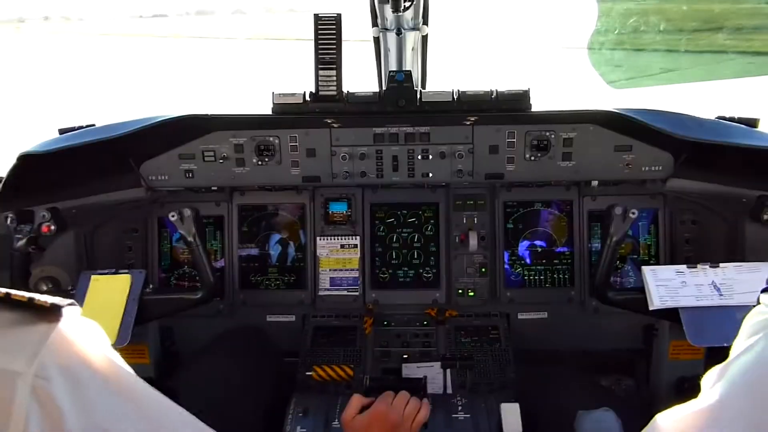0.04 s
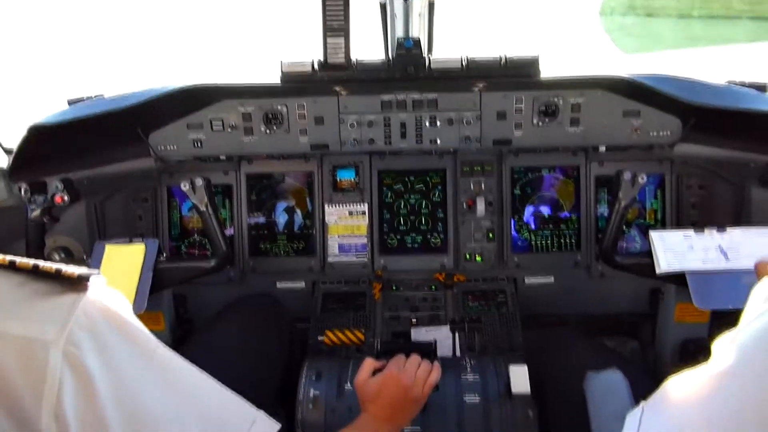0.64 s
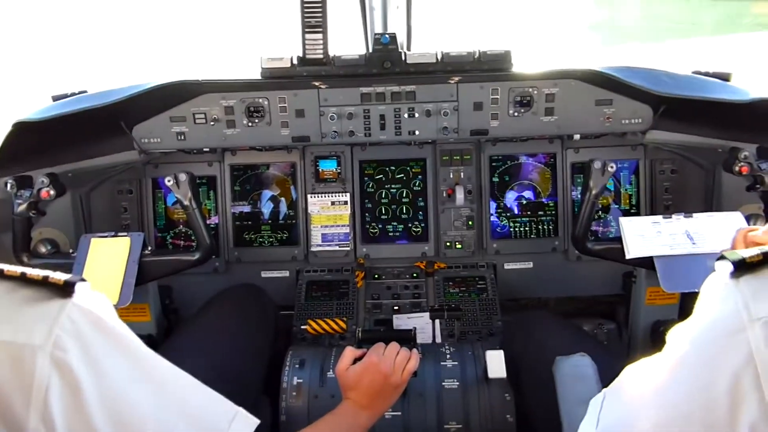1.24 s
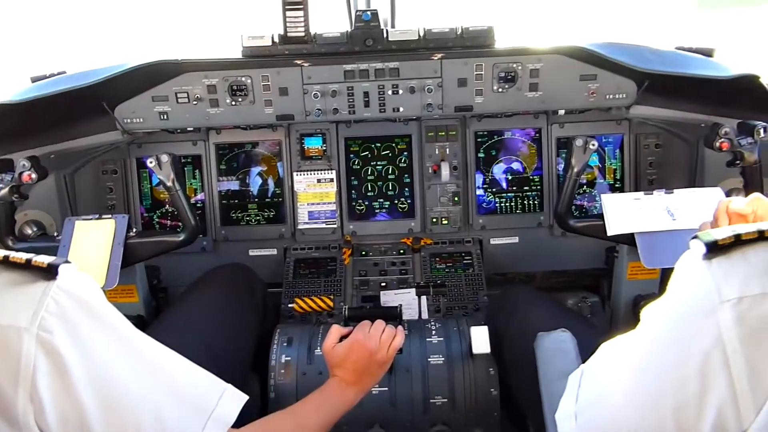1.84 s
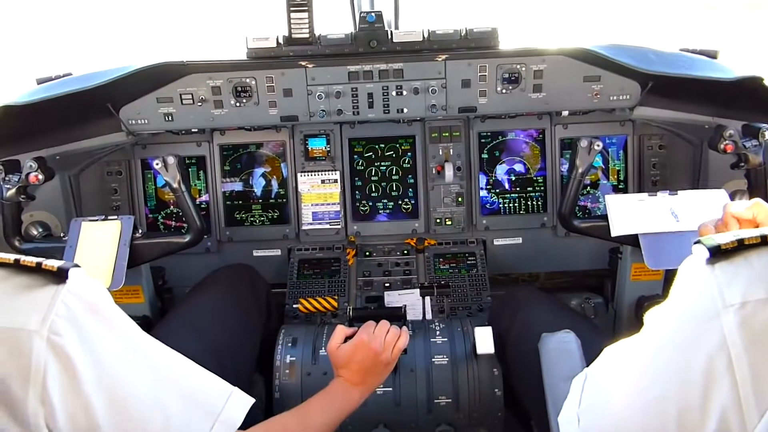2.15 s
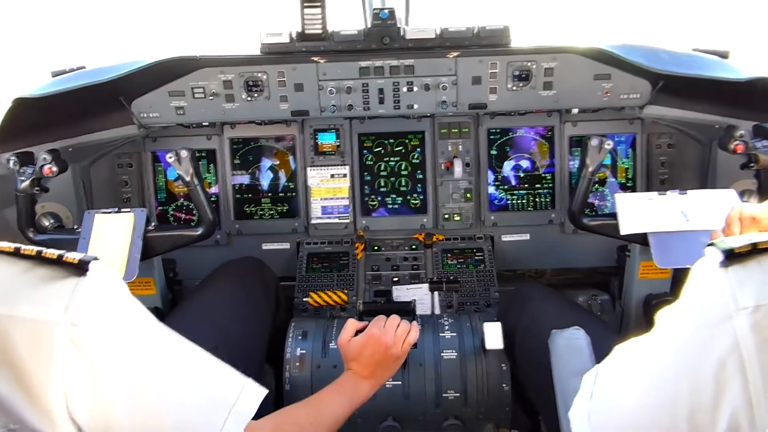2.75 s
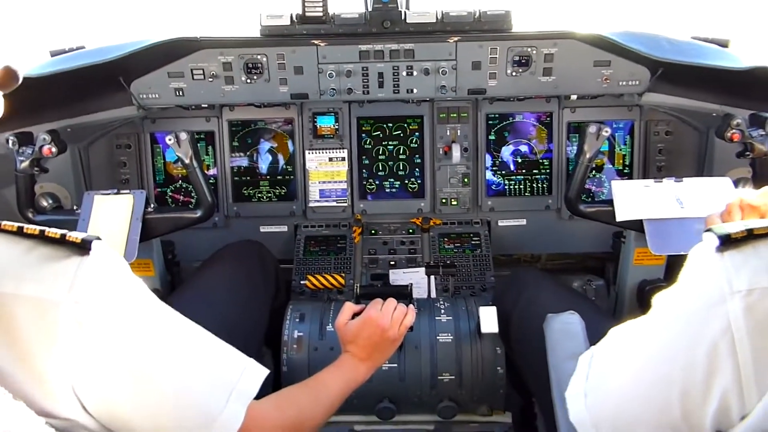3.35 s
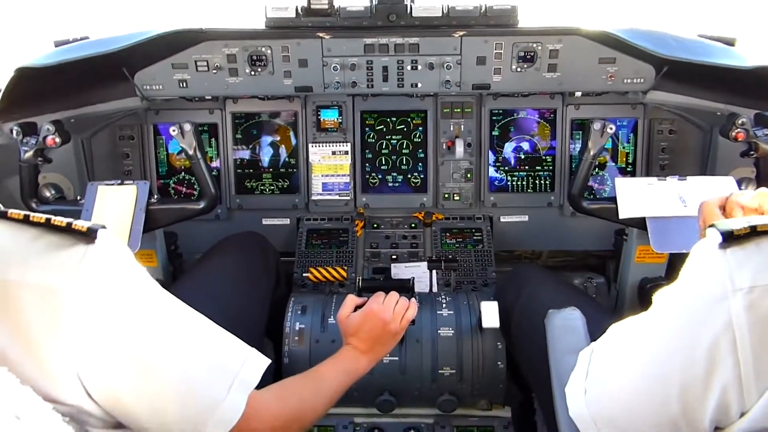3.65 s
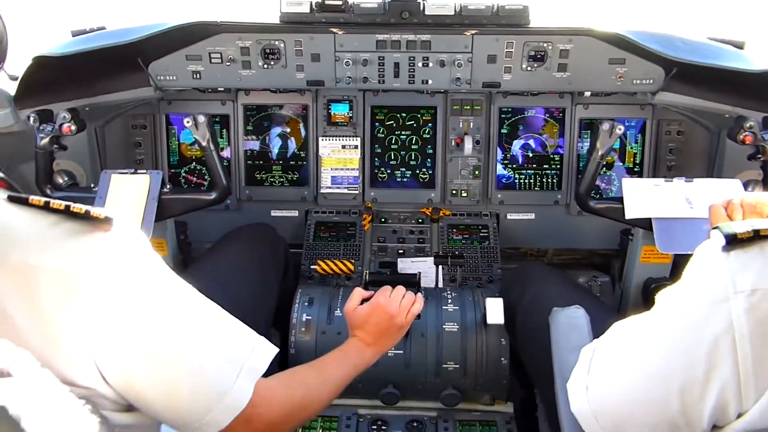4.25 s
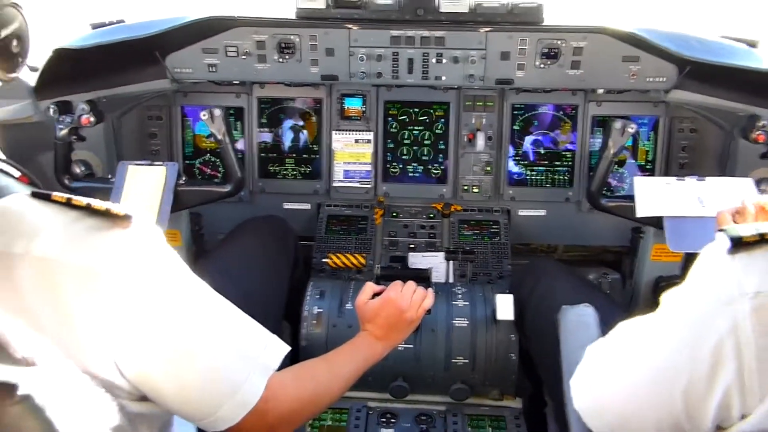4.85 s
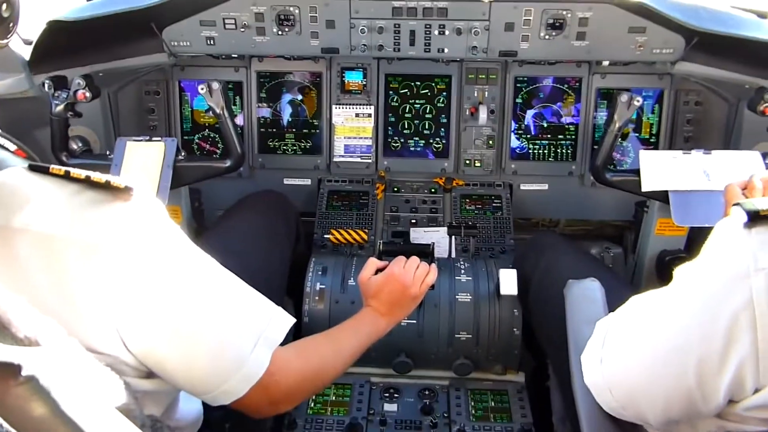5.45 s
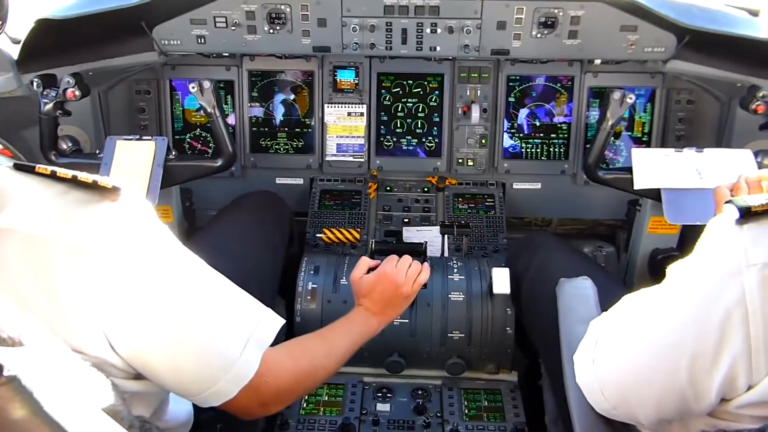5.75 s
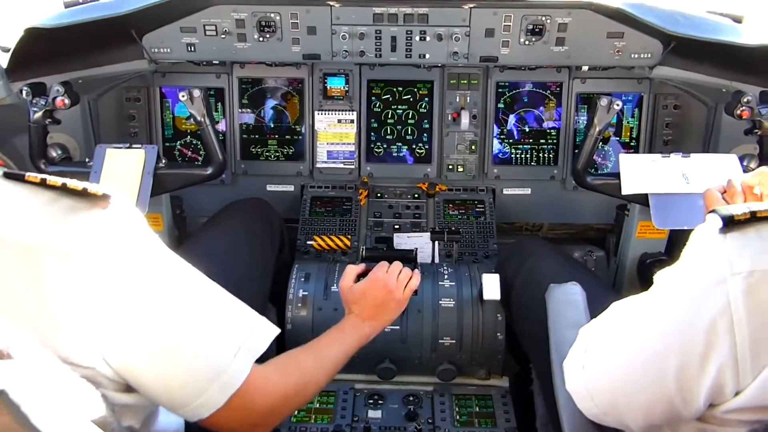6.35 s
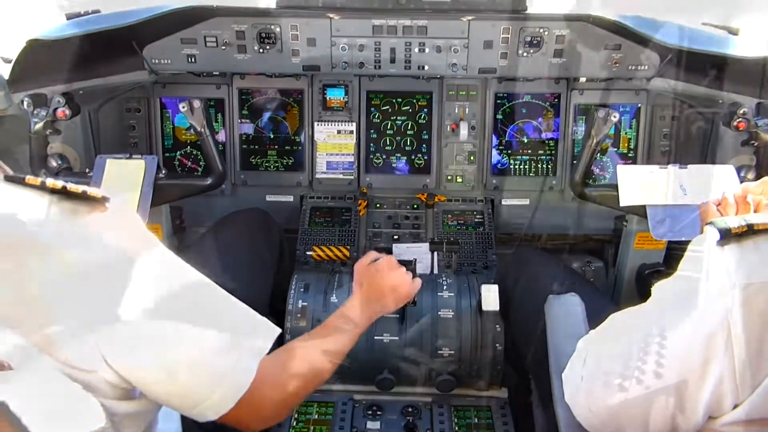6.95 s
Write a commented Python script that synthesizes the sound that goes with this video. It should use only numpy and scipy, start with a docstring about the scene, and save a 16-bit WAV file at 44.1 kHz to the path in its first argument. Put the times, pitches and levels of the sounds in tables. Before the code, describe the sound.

A throbbing propeller drone and deep rumble fill a taxiing turboprop's cockpit, with air vents hissing and a loose panel clacking over bumps.

```python
"""A throbbing propeller drone over a deep rumble: a twin turboprop taxiing, heard from the back of its cockpit.
The blades drone through the hull and their wash shakes it; vents hiss, turbines and fans whine faintly.
Bumps in the taxiway shake a loose panel, which clacks a little lower when hit hard,
and a few dry ticks snap close to the microphone."""
import sys
import numpy as np
from scipy import signal
from scipy.fft import rfft, irfft, next_fast_len
from scipy.io import wavfile
from scipy.ndimage import uniform_filter1d

SR = 44100
rng = np.random.default_rng(int(sys.argv[2]) if len(sys.argv) > 2 else 0)


def transcribe(signal):
    """Save signal, clipped to [-1, 1], as a 16-bit WAV file at the path in sys.argv[1]."""
    frames = np.atleast_2d(signal).T
    limited = np.clip(frames, -1, 1)
    pcm = np.round(limited * 32767).astype(np.int16)
    wavfile.write(sys.argv[1], SR, pcm)


N = 313551
T = np.arange(N) / SR
SIZE = next_fast_len(N, real=True)
HZ = np.maximum(np.arange(SIZE // 2 + 1) * SR / SIZE, 1)


def undb(db):
    """Decibels to gain."""
    return 10 ** (np.asarray(db) / 20)


def unit(x):
    """Scale to rms 1."""
    return x / np.sqrt(np.mean(np.abs(x) ** 2))


def curve(table, column=1):
    """Automation lane: one column of (time [s], ...) rows at every sample."""
    rows = np.array(table)
    return np.interp(T, rows[:, 0], rows[:, column])


def colour(points):
    """EQ curve: gain at every frequency from (frequency [Hz], level [dB]) points."""
    hz, db = np.transpose(points)
    return undb(np.interp(np.log(HZ), np.log(hz), db))


def bell(hz, width_hz):
    """Gain of a resonance with steep skirts, 1 at its centre."""
    return 1 / (1 + (2 * (HZ - hz) / width_hz) ** 4)


def shape(x, gain):
    """Filter by a gain at every frequency."""
    return irfft(rfft(x, SIZE) * gain, SIZE)[..., :N]


def walk(rate):
    """Smooth random drift of rms 1 that moves up to about rate times a second."""
    count = int(4 * rate * N / SR) + 8
    steps = np.convolve(rng.standard_normal(count), np.hanning(7)[1:-1] ** 4, "same")
    return unit(np.interp(T, np.arange(count) / (4 * rate), steps))


def swell(x, db):
    """Even out a noise's slow swells and ride it with a dB curve; the mean level stays."""
    power = uniform_filter1d(np.mean(x ** 2, axis=0), size=SR // 8)
    return x * np.sqrt(power.mean() / power) * unit(undb(db))


def shudder(age, t60_s, rise_s=.003):
    """Envelope of a burst of contacts that builds up to age 0 and dies away."""
    return np.exp(-np.log(1000) * np.maximum(age, 0) / t60_s) * (1 + np.tanh(age / rise_s + 1)) / 2


def cabin_noise(density):
    """Noise of a given spectrum at both microphone ports: alike in the bass, wider in the treble."""
    # sound that differs between the ports against sound they share: (frequency [Hz], ratio [dB])
    diffuse = [(25, -1), (45, -8), (65, -15), (100, -29), (200, -34), (260, -32), (330, -26), (420, -23),
               (520, -16.5), (750, -7), (1200, 0), (2500, 0), (5000, .5), (8000, .5), (12000, 5)]
    real, imag = rng.standard_normal((2, 2, len(HZ)))
    shared, own = (real + 1j * imag) * density * np.sqrt(SR * SIZE) / 2
    apart = colour(diffuse)
    left = (shared + apart * own) / np.hypot(1, apart)
    return irfft(np.array([left, shared]), SIZE)[:, :N]


def standing_waves(ripple_db=1.2, spacing_hz=35):
    """Gain of the many fine peaks and dips that the cabin's walls put on a sound."""
    count = int(SR / 2 / spacing_hz) + 2
    return unit(undb(ripple_db * np.interp(HZ, np.arange(count) * spacing_hz, rng.standard_normal(count))))


def fans():
    """Cooling fans whistle faintly: thin, unsteady tones of narrow-band noise."""
    # fan whistles: (pitch [Hz], level [dB], width [Hz])
    whistles = [(10119, -67, 100), (14260, -64, 190)]
    return cabin_noise(sum(undb(db) * bell(hz, width) / np.sqrt(width) for hz, db, width in whistles))


def turbines(gain_db=4.7, wander_hz=.8, waver_db=1.5):
    """Each engine's gears sing a thin, wandering tone with a sideband on either side."""
    # gear whine of engines 1 and 2: (time [s], pitch 1 [Hz], pitch 2 [Hz], fader 1 [dB], fader 2 [dB])
    whine = [(0, 4150, 4122, -55, -60), (.9, 4152, 4120, -60, -59), (1.4, 4160, 4124, -54, -64),
             (2.2, 4166, 4133, -61, -59), (3, 4169, 4140, -62, -54), (3.7, 4169, 4139, -60, -50),
             (4.3, 4160, 4138, -56, -54), (4.8, 4156, 4138, -63, -55.5), (5.3, 4155, 4136, -58, -54),
             (6.2, 4152, 4137, -65, -61), (7.11, 4150, 4137, -66, -68)]
    # the tone and the sidebands from its shaft's turning: (offset [Hz], gain 1 [dB], gain 2 [dB])
    sidebands = [(-66, -1, -16), (0, 0, 0), (66, -3, -5)]
    out = 0
    for engine in range(2):
        hz = curve(whine, column=1 + engine) + wander_hz * walk(4)
        level_db = curve(whine, column=3 + engine) + gain_db
        for offset_hz, *side_db in sidebands:
            gain = undb(level_db + side_db[engine] + waver_db * walk(3))
            out = out + gain * np.sqrt(2) * np.sin(2 * np.pi * np.cumsum(hz + offset_hz) / SR)
    return out


def vents(flutter_db=0.84):
    """Slightly fluttering air hiss, coloured by its ducts, with two jets and a thin whistle at an edge."""
    # tone of the hiss: (frequency [Hz], density [dB per Hz])
    hiss_eq = [(300, -78.5), (900, -62.5), (1450, -62), (1750, -65.5), (2150, -64), (2900, -64.5),
               (3300, -68.5), (4200, -71), (5000, -79), (6000, -78.5), (8000, -81.5), (10200, -86.5),
               (12000, -90.5), (15000, -93.5)]
    # slow ride of the hiss: (time [s], gain [dB])
    hiss_ride = [(0, 0.5), (1.5, 0), (2.1, -1), (3, 0.5), (4.7, -0.5), (5.8, 0.5), (6.6, 0.2), (7.11, 1.2)]
    # duct resonances and the hollows between them: (centre [Hz], width [Hz], gain [dB])
    ducts = [(1280, 90, 1.5), (1405, 90, -2.5), (1515, 70, 2), (1890, 120, -0.8), (2170, 70, 1.8),
             (2360, 150, -1.6), (2520, 120, 0.8), (2900, 80, 1), (3200, 60, -1.2), (3330, 80, -1.2),
             (12400, 400, 1.5)]
    # air jets, louder or softer as the microphone turns: (time [s], low jet [dB], high jet [dB])
    jets = [(0, -39.5, -44), (.7, -37.5, -73), (1.4, -37, -62), (2.1, -41.5, -60), (2.9, -38.5, -58),
            (4.2, -42, -55), (4.6, -53, -57), (6.3, -64, -56), (7.1, -49, -42)]
    # ride of the whistle: (time [s], level [dB])
    whistle_ride = [(0, -53), (1.3, -50), (2, -60), (7.11, -68)]
    ripple = standing_waves()
    duct_gain = undb(sum(db * bell(hz, width) for hz, width, db in ducts))
    hiss = cabin_noise(colour(hiss_eq) * duct_gain * ripple) * undb(curve(hiss_ride))
    low_jet = unit(cabin_noise(bell(hz=4230, width_hz=2050) * ripple)) * undb(curve(jets, column=1))
    high_jet = unit(cabin_noise(bell(hz=7400, width_hz=4700) * ripple)) * undb(curve(jets, column=2))
    whistle = unit(cabin_noise(bell(hz=2783, width_hz=45))) * undb(curve(whistle_ride))
    return (hiss + low_jet + high_jet + whistle) * undb(flutter_db * walk(25))


def ticks():
    """Tiny dry snaps, each only a few cycles long, a touch to the right."""
    # snaps: (time [s], pitch [Hz], level [dB], half-length [s])
    snaps = [(1.6272, 7040, -3.5, 0.00012), (1.6279, 3150, -8, 0.00031), (1.628, 6500, -27, 0.0003),
             (2.061, 3020, -22, 0.00033), (3.7930, 3500, -10.5, 0.0005), (3.7933, 1300, -18, .0009)]
    out = sum(undb(db) * np.exp(-((T - s) / half_s) ** 2) * np.sin(2 * np.pi * hz * (T - s))
              for s, hz, db, half_s in snaps)
    return out * undb([[-1.5], [0]])


def panel_ring(age, decay_age, jolt_db, focus_hz, focus_db=7, clack_hz=2125, sag_hz=430, detune=.002):
    """The panel's modes ring on; the harder the jolt, the lower its main clack sags."""
    # panel modes: (pitch [Hz], relative level [dB], t60 [s])
    panel = [(995, -2, .09), (1090, .5, .1), (1475, -.5, .09), (1560, -2, .08), (1850, -3.5, .09),
             (2190, -6, .08), (2470, -7, .09), (2715, -5, .09), (2850, -5.5, .08), (3190, -2.5, .075),
             (3540, -3.5, .08), (3650, -3.5, .08), (3770, -4.5, .08), (4050, -4, .08), (4200, -5.5, .07),
             (4470, -8, .07), (4860, -8, .08), (5130, -11, .08)]
    modes = panel + [(clack_hz - sag_hz * undb(jolt_db), 1, .1)]
    ring = 0
    for (hz, db, t60), (scatter, phase) in zip(modes, rng.standard_normal((len(modes), 2))):
        # the place of contact favours the modes around one pitch
        away = min(2 * abs(np.log2(hz / focus_hz)), 1)
        swing = np.sin(2 * np.pi * (hz * (1 + detune * scatter) * age + phase))
        ring = ring + undb(db - focus_db * away) * shudder(decay_age, t60) * swing
    return ring


def loose_panel(body_lag_s=0.0023, clatter_db=-3, edge_db=1, ring_db=-2.5):
    """Each bump sets off a chatter: its sharp edge cracks first, the frame knocks and the panel rings."""
    # taxiway jolts: (time [s], gain [dB], edge send [dB], ring send [dB], favoured pitch [Hz])
    jolts = [(.274, -25, -1, -1, 2100), (0.474, -15, -5.5, 1, 4070), (0.783, -23.5, -3, 2.5, 3700),
             (.998, -21.5, -8, -9, 2600), (1.040, -23.5, -4, -2, 2050), (1.344, -23.5, -6, -6, 4800),
             (1.388, -20, -4, 5.5, 4950), (1.576, -15, -0.5, 2, 1670), (1.726, -42, 12, -6, 2100),
             (1.845, -26.5, -4, -3, 2100), (2.395, -34, 2, -4, 2100), (2.524, -14.5, -3, 0.5, 1040),
             (2.735, -37, 5, -4, 2100), (2.842, -29, 2.5, -1, 2100), (3.254, -34, 5, -2, 2100),
             (3.438, -46, 7, -2, 2100), (3.554, -39, 11, 1, 2100), (3.835, -32, 6, 10, 2100),
             (4.075, -28, 1.5, 6, 2120), (4.199, -37, 6, 0, 2100), (4.405, -33, -3, 6, 2100),
             (4.646, -29, 2, 5.5, 2100), (4.903, -28, 3.5, 6, 2140), (5.193, -27.5, 4, 7, 2140),
             (5.415, -14.5, -2.5, 1, 2600), (6.173, -46, 7, -1, 2100), (6.327, -42, -2, 12, 2100),
             (6.530, -31, -1, 3, 2120)]
    # tone of the chatter: (frequency [Hz], relative level [dB])
    chatter_eq = [(400, -24), (1000, -3.5), (1300, -13), (1550, 1), (2800, -1.5), (4300, -6.5),
                  (5500, -6.5), (8000, -13.5), (10000, -15), (13000, -21), (15500, -27)]
    # woody modes of the frame behind the panel: (pitch [Hz], relative level [dB], t60 [s])
    frame = [(578, -1, .09), (695, -6, .07), (800, -8, .06)]
    chatter = unit(cabin_noise(colour(chatter_eq)) * undb(2 * walk(540)))
    body = shape(chatter, 1 / (1 + (HZ / 5000) ** 4))
    edge = chatter - body
    out = np.zeros((2, N))
    for s, db, edge_send_db, ring_send_db, focus_hz in jolts:
        span = slice(int(s * SR) - SR // 50, int(s * SR) + SR // 6)
        age = T[span] - s
        body_age = age - body_lag_s
        ring = undb(ring_send_db + ring_db) * panel_ring(age, body_age, db, focus_hz)
        knock = sum(undb(mode_db) * shudder(body_age, t60) * np.sin(2 * np.pi * (hz * age + rng.random()))
                    for hz, mode_db, t60 in frame)
        favoured = signal.lfilter(*signal.iirpeak(focus_hz, Q=2, fs=SR), body[:, span])
        clatter = undb(clatter_db) * (body[:, span] + .5 * favoured) * shudder(body_age, t60_s=0.14)
        crack = undb(edge_send_db + edge_db) * edge[:, span] * shudder(age, t60_s=0.11)
        out[:, span] += undb(db) * (clatter + crack + knock + ring)
    return out


def wash(gust_db=0.5, gust_per_s=8, roll_db=3, roll_per_s=4.5, wheels_below_hz=112):
    """Gusty propeller wash and rolling wheels shake the hull, which rings the cabin's air."""
    # tone of the rumble through the hull: (frequency [Hz], density [dB per Hz])
    rumble_eq = [(20, -92), (48, -97), (68, -74), (88, -52), (125, -51), (215, -44), (280, -47.5),
                 (400, -44.5), (540, -47.5), (640, -52.5), (850, -54), (1080, -60.5), (1300, -72),
                 (3000, -81.5)]
    # cabin resonances and the hollows between them: (centre [Hz], width [Hz], gain [dB])
    cabin = [(178, 16, 4.5), (215, 22, -2.5), (296, 20, 6), (317, 20, 5.5), (372, 38, 3), (426, 22, 3),
             (466, 18, -2), (516, 50, 3.3), (645, 30, -1.5), (698, 48, 4.5), (750, 40, 1.5),
             (1090, 70, 1.5)]
    # slow ride of the wash on the hull: (time [s], relative level [dB])
    wash_ride = [(0.0, -15.5), (0.14, -18), (0.28, -16.5), (0.42, -19.5), (0.53, -16), (0.65, -20.5),
                 (0.72, -17), (0.88, -20.5), (1.02, -17.0), (1.28, -18.5), (1.48, -17), (1.72, -20.5),
                 (1.92, -18), (2.08, -20.0), (2.2, -18.5), (2.88, -17.5), (2.98, -17), (3.12, -19),
                 (3.24, -16.5), (3.6, -19.5), (3.88, -18.5), (4.22, -18), (4.32, -19.5), (4.5, -18),
                 (4.75, -21), (4.82, -16.5), (4.9, -22), (4.97, -18.5), (5.06, -20.5), (5.2, -19.0),
                 (5.38, -21.5), (5.6, -16.5), (5.84, -19), (5.92, -16), (6.04, -18.5), (6.26, -20),
                 (6.52, -16.5), (6.9, -19.5), (7.1, -16)]
    cabin_gain = undb(sum(db * bell(hz, width) for hz, width, db in cabin))
    rumble = cabin_noise(colour(rumble_eq) * cabin_gain / (1 + (HZ / 5000) ** 4))
    wheels = shape(rumble, 1 / (1 + (HZ / wheels_below_hz) ** 16))
    air_db = curve(wash_ride) + gust_db * walk(gust_per_s)
    return swell(rumble - wheels, air_db) + swell(wheels, roll_db * walk(roll_per_s))


def blade_tone(hz, rough, gust_rate):
    """One blade harmonic, scattered in size and phase by gusty inflow, then levelled over 1/12 s."""
    load = 1 + rough * (walk(gust_rate) + 1j * walk(gust_rate)) / np.sqrt(2)
    load = load / np.sqrt(uniform_filter1d(np.abs(load) ** 2, size=SR // 12))
    return np.sqrt(2) * np.real(load * np.exp(2j * np.pi * hz * T))


def propellers(blade_hz=64.1, third_db=-1, fourth_db=1, waver_db=1.3, waver_per_s=13):
    """Blade harmonics; the third and fourth meet cabin resonances and waver, the third throbs loudest."""
    # steadier blade harmonics: (multiple, level [dB], roughness)
    harmonics = [(1, -53, 1.0), (2, -34, 0.55), (5, -42.5, 0.89), (6, -43, 2.2)]
    # the drone on the third harmonic swells and sinks: (time [s], fader [dB])
    drone_ride = [(0.0, -49), (0.15, -14.5), (0.24, -26), (0.35, -17), (0.5, -38), (0.74, -12), (0.88, -42),
                  (0.96, -22), (1.22, -18.5), (1.3, -39), (1.38, -17.5), (1.64, -28), (1.7, -18.5),
                  (1.94, -20), (2.1, -24), (2.3, -26.5), (2.36, -19), (2.5, -32), (2.56, -23), (2.9, -17.5),
                  (3.02, -33), (3.08, -15.5), (3.38, -28), (3.46, -20), (3.6, -14.5), (3.72, -26),
                  (4.12, -19.5), (4.2, -36), (4.5, -16), (4.66, -23.5), (4.84, -22), (4.98, -29),
                  (5.08, -21), (5.3, -17), (5.36, -44), (5.42, -22.5), (5.6, -20.5), (5.9, -25.5),
                  (5.96, -15), (6.22, -46), (6.28, -23.0), (6.4, -16.5), (6.54, -24), (6.7, -18),
                  (6.88, -22.5), (6.96, -15), (7.1, -31)]
    # ride of the overtone on the fourth: (time [s], fader [dB])
    overtone_ride = [(0.0, -32), (0.14, -26.5), (1.26, -36), (1.44, -21.5), (1.54, -37), (2.44, -23.5),
                     (2.56, -40), (2.72, -23.5), (3.14, -27), (3.58, -23.5), (3.8, -30), (4.04, -25),
                     (4.5, -31.5), (4.7, -21.5), (5.02, -27), (5.42, -32), (5.82, -20), (5.96, -29),
                     (6.42, -23.5), (6.68, -33), (6.9, -21.5), (7.1, -28)]
    hum = sum(undb(db) * blade_tone(k * blade_hz, rough, gust_rate=3.5) for k, db, rough in harmonics)
    # the resonances lie just under the harmonics and pull their pitch down a little
    third = blade_tone(3 * blade_hz - 1.1, rough=1.8, gust_rate=6)
    fourth = blade_tone(4 * blade_hz - 4, rough=2.5, gust_rate=10)
    third *= undb(curve(drone_ride) + third_db + waver_db * walk(waver_per_s))
    fourth *= undb(curve(overtone_ride) + fourth_db + waver_db * walk(waver_per_s))
    return hum + third + fourth


def scene(port_lag_s=7.3e-5, alike_below_hz=560):
    """The cabin reaches the left port later and duller than the right; the ticks are close to both."""
    # shading of the left port: (frequency [Hz], gain [dB])
    left_shade = [(750, -0.6), (1050, -2), (1300, -6.5), (2100, -8.5), (3000, -11.5), (4500, -12.5),
                  (5700, -7), (6400, -3), (8500, -1), (12000, -3), (15000, -8)]
    left, right = propellers() + wash() + turbines() + vents() + fans() + loose_panel()
    # the bass fills the small cabin evenly and reaches both ports alike
    shade = colour([(450, 0)] + left_shade)
    lag_s = port_lag_s / (1 + (alike_below_hz / HZ) ** 4)
    left = shape(left, shade * np.exp(-2j * np.pi * HZ * lag_s))
    return np.array([left, right]) + ticks()


def record(dry, notch_hz=9080, notch_width_hz=400, notch_db=-24, top_hz=15300):
    """The microphone has a narrow treble notch; the top is cut steeply."""
    heard = shape(dry, undb(notch_db * bell(notch_hz, notch_width_hz)))
    return signal.sosfilt(signal.ellip(10, .2, 80, top_hz, fs=SR, output="sos"), heard)


dry = scene()
out = record(dry)
transcribe(out)
```